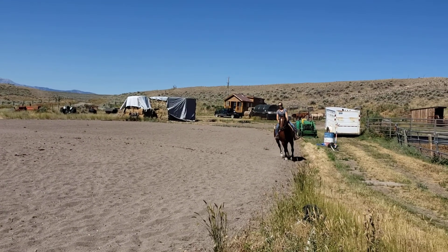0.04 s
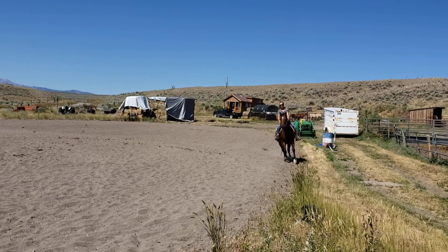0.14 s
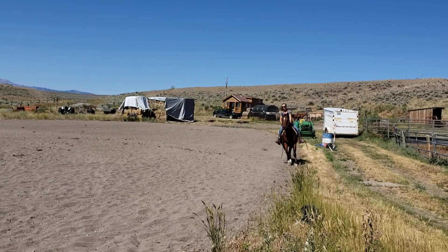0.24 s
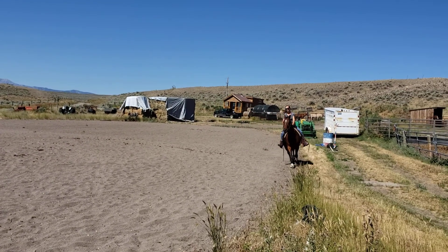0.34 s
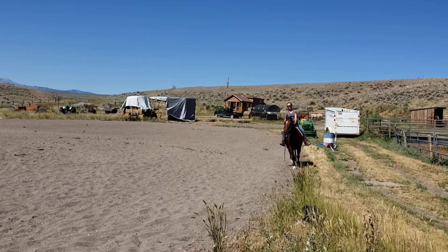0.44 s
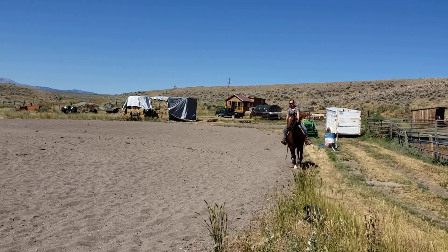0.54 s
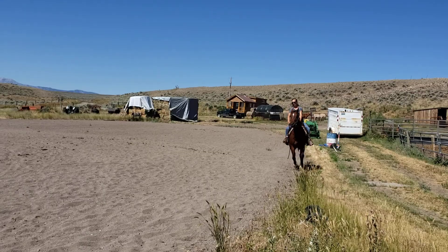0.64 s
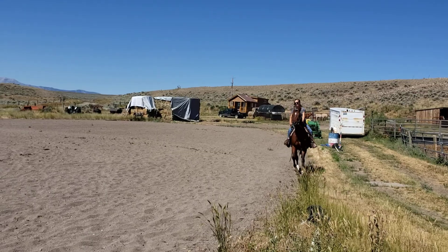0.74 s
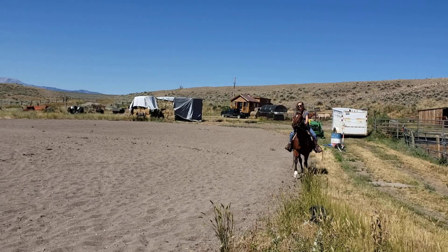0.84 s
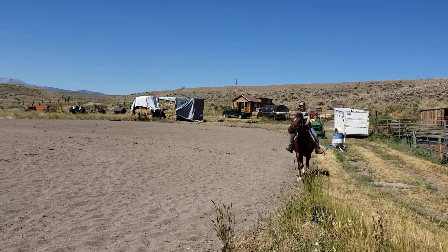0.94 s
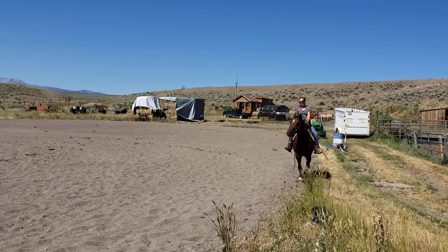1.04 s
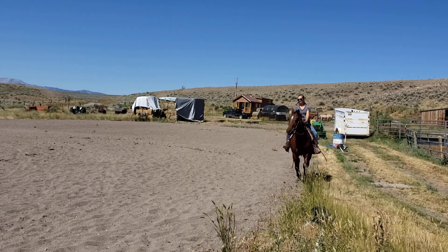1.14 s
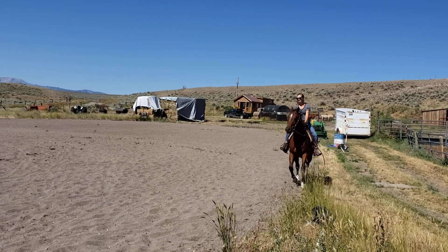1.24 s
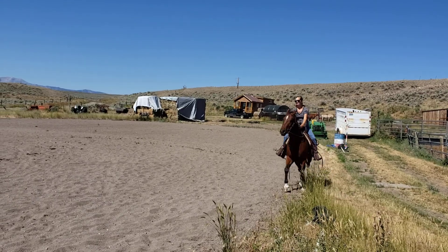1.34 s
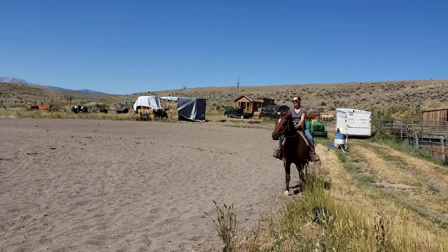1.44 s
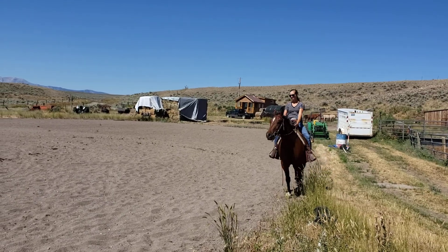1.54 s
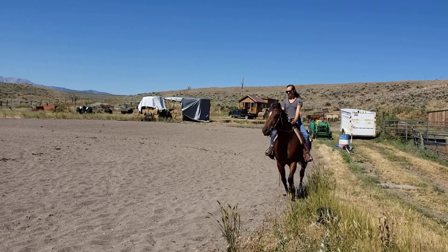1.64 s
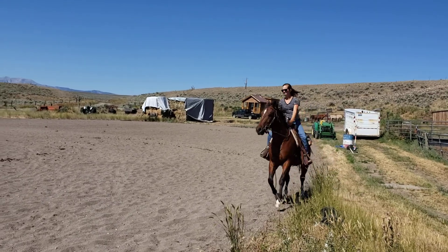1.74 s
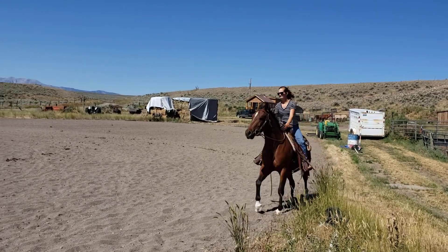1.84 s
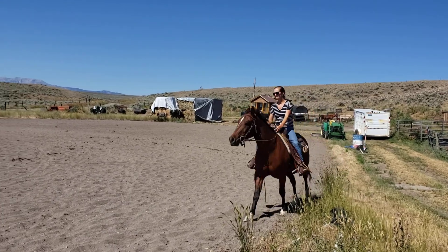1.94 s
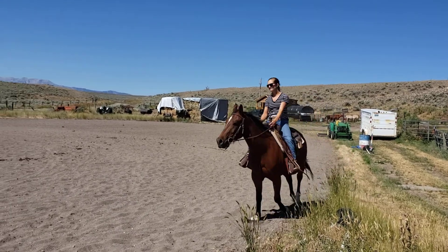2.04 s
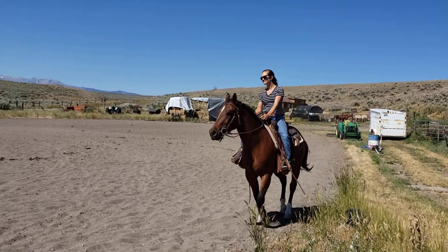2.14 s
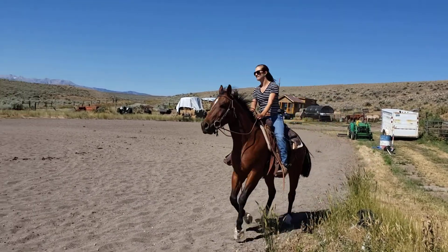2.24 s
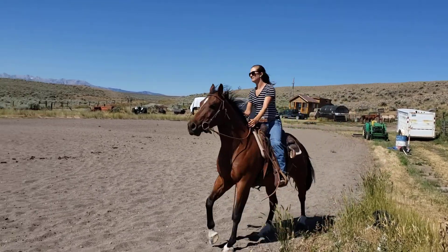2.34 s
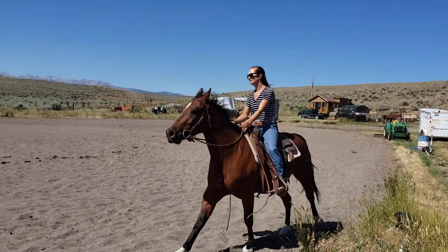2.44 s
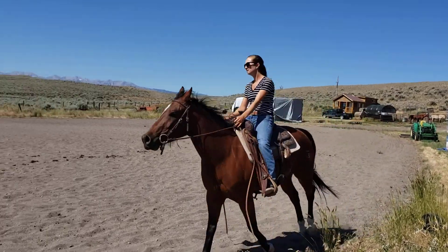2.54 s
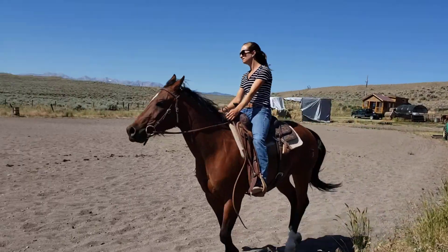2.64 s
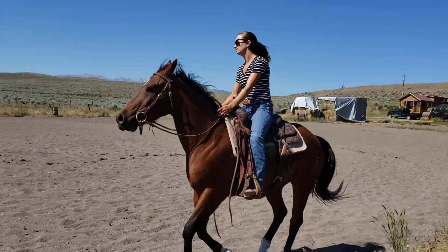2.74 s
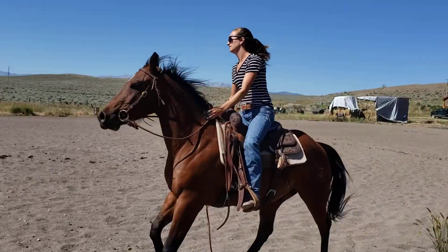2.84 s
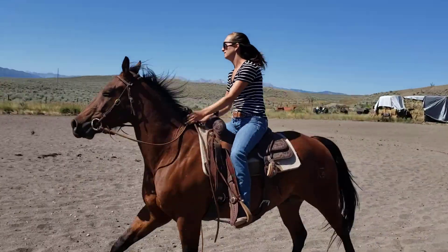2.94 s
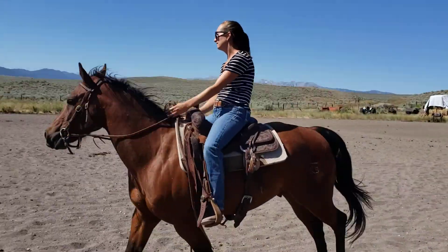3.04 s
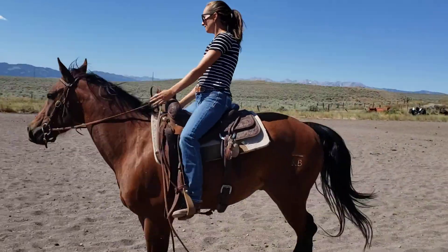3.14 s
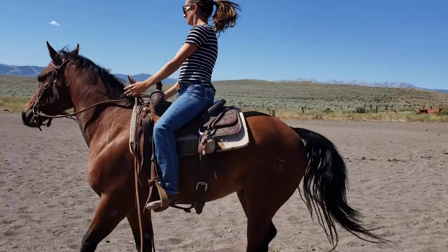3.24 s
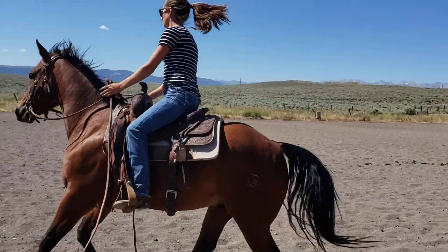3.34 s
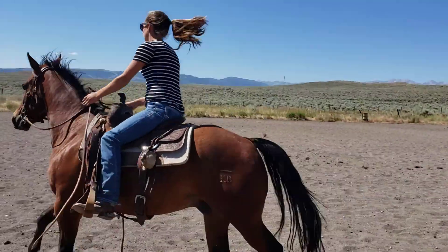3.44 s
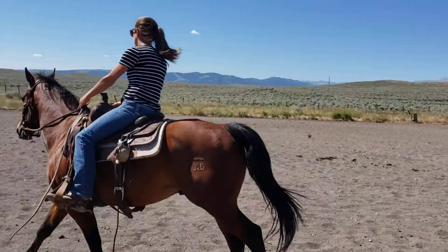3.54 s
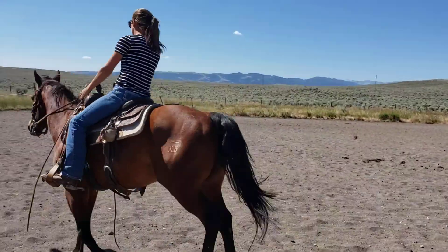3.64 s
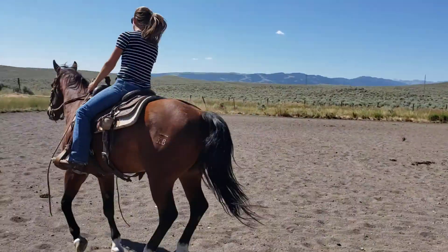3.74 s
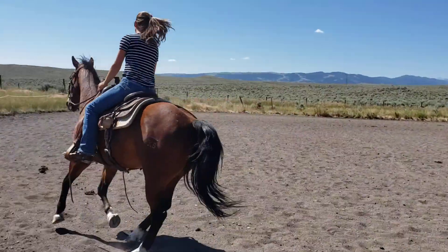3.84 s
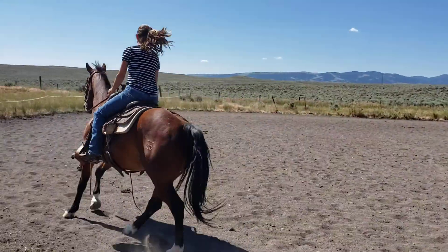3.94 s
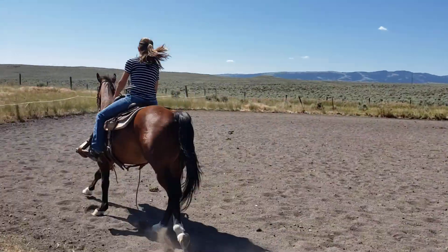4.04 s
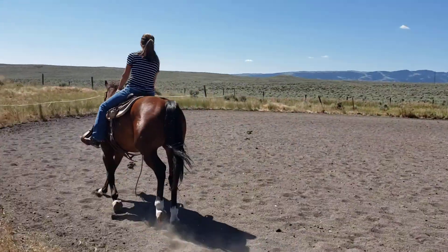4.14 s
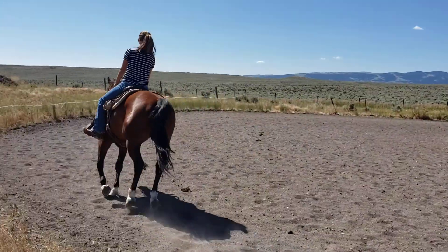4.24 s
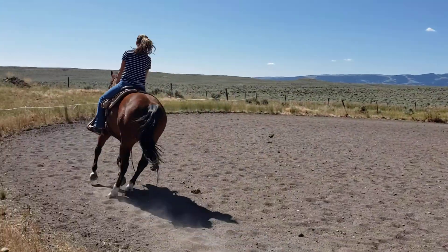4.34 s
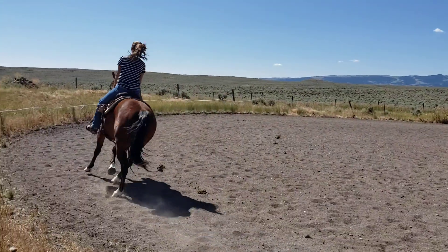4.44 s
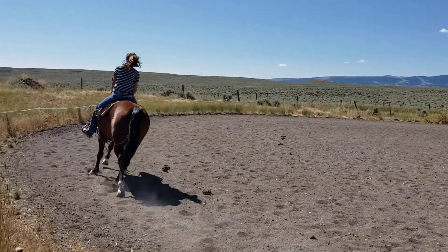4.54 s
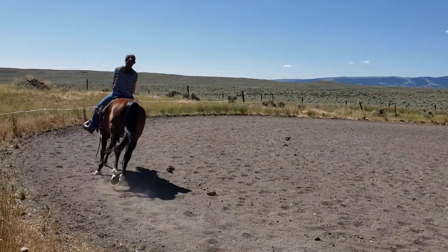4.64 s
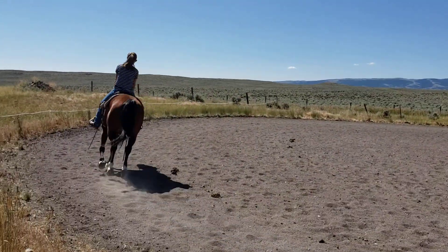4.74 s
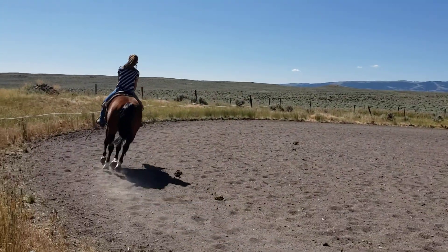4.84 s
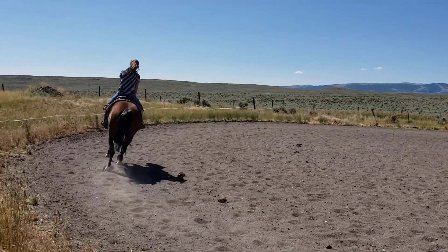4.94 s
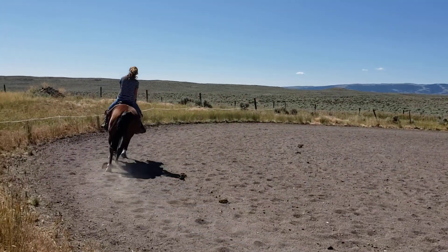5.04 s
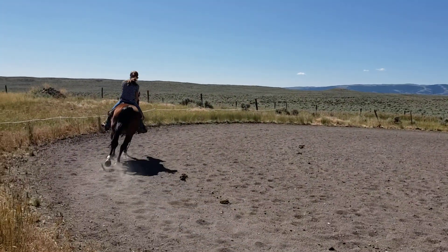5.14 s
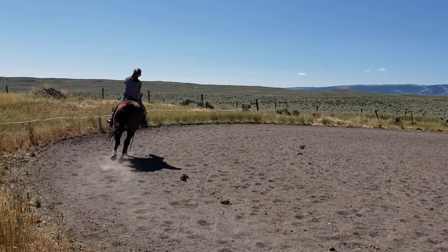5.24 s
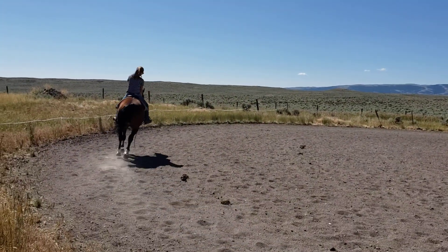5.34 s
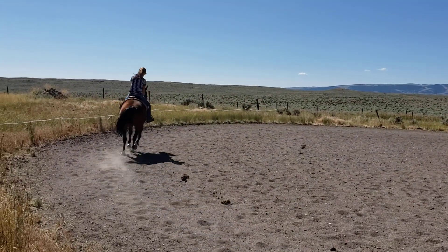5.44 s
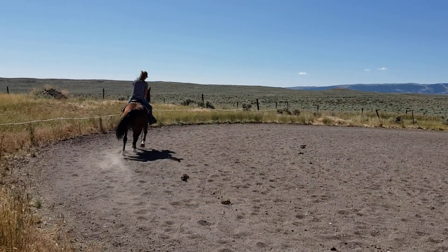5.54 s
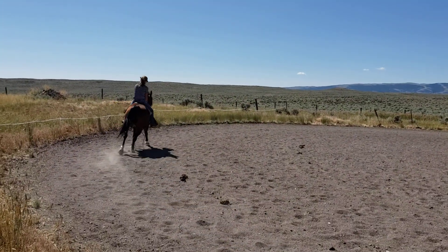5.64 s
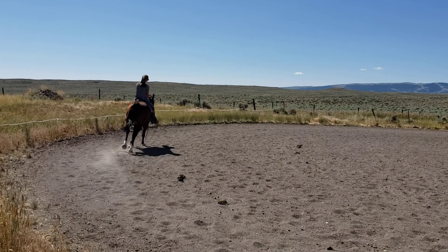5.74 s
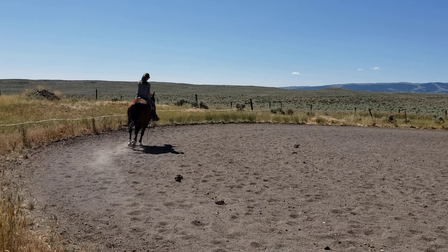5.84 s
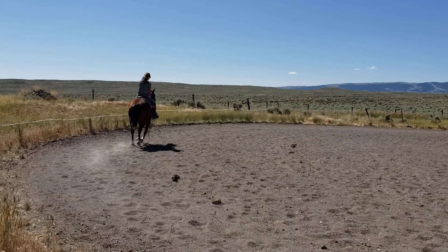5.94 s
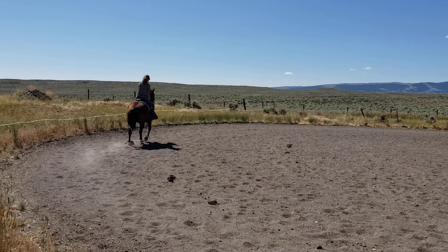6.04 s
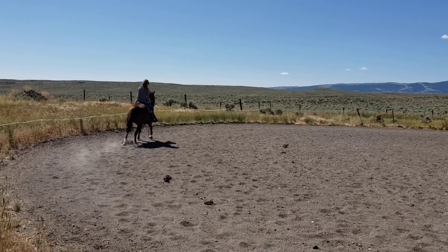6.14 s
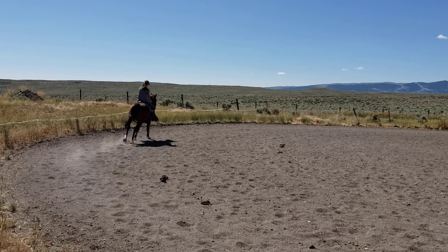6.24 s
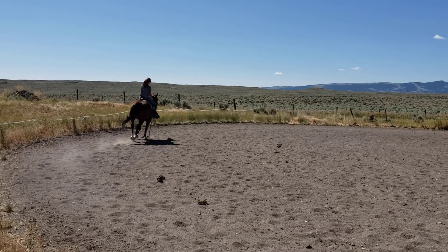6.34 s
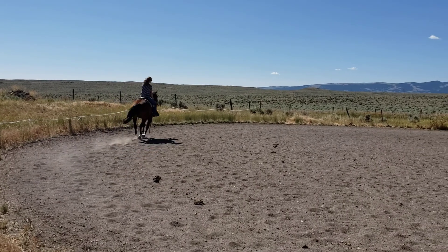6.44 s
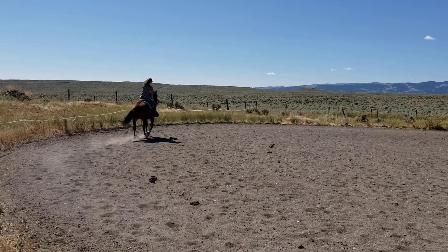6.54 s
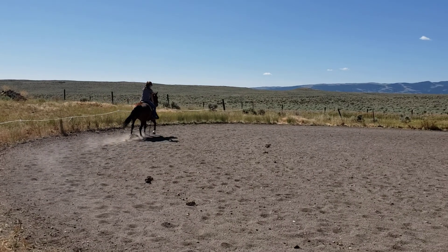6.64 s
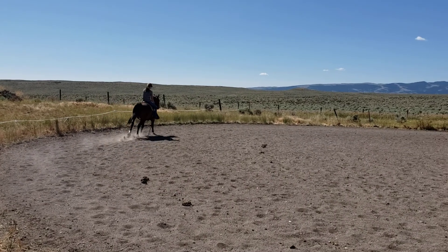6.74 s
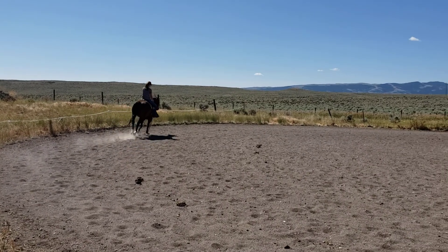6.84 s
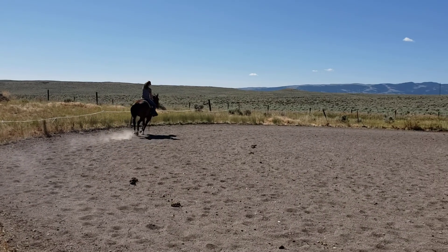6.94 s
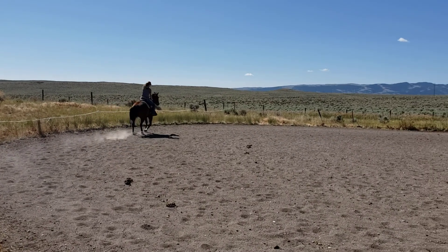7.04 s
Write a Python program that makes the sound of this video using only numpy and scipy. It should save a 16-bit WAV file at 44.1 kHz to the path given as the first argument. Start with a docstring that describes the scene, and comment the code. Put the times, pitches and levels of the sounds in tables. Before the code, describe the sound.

Three-beat hoof falls come closer over loose sand, dull and low, with faint hollow hoots, bright tack ticks and grassy rustle. They strike loudest beside the hand-held microphone, throwing hissing grains, then dwindle. Low gusts buffet mainly the right side, the horse stays mainly left, and high insect hiss lingers in open, echo-free air.

```python
"""A ridden horse lopes over a sand arena, passes close to a hand-held microphone and moves off into open country.
Each hoof thumps the ground (damped pressure swing), crushes sand and throws a spray (shaped noise grains).
Reins and buckles slap and rattle (cracks with noise tails), links jingle (decaying modes), tack and grass rustle.
Soft low gliding hoots come with the stride, insects hiss in bands of noise, gusts buffet and pop the microphone.
No walls, so nothing echoes."""
import sys
import numpy as np
from scipy import signal
from scipy.fft import rfft, irfft
from scipy.io import wavfile

SR = 44100
rng = np.random.default_rng(int(sys.argv[2]) if len(sys.argv) > 2 else 0)


def output_pcm(signal):
    """Save a mono or channel-first signal as 16-bit PCM at the path in sys.argv[1].

    Samples are clipped to [-1, 1] before scaling.
    """
    pcm = np.clip(np.atleast_2d(signal).T, -1, 1) * 32767
    wavfile.write(sys.argv[1], SR, np.round(pcm).astype(np.int16))


N = 312228  # samples, 7.08 s
T = np.arange(N) / SR
FREQ_HZ = np.arange(N // 2 + 1) * SR / N

# Table levels are relative: layers may add a trim.
# hoof landings: landing_s, thump_db, thump_hz, knock_db, crunch_db, sand_hiss_db, shudder_db (re thump), thrown_db
HOOF_LANDINGS = [(0.205, -58, 150, -85, -101, -80, -17, -95), (0.315, -53, 180, -73, -100, -90, -14, -94),
                 (0.431, -70, 133, -77, -84, -74, -5, -73), (0.729, -50.5, 132, -77, -85, -80, -10, -74),
                 (0.852, -41, 181, -70, -94, -79.5, -7.5, -79), (0.949, -64, 175, -70, -91, -68, -3, -68),
                 (1.216, -62, 141, -90, -80, -67, 3, -75), (1.359, -56, 116, -78, -91, -67, -9.5, -72),
                 (1.496, -47.5, 117, -68, -92, -84, -2.5, -67.5),
                 (1.737, -51, 145, -82, -78, -64.5, -16, -64.5),
                 (1.867, -42.5, 149, -63, -77, -63, -8, -63), (1.908, -50, 151, -74, -77, -59.5, -9, -72),
                 (1.99, -51.5, 202, -62, -71, -56, -14, -74),
                 (2.256, -33.5, 137, -74, -68, -55.5, -16.5, -63.5),
                 (2.383, -26, 181, -40, -55, -49.5, -18, -54.5),
                 (2.509, -31.5, 213, -40.5, -91, -48.5, -7, -46),
                 (2.774, -23.5, 194, -55, -56, -45.5, -18, -51),
                 (2.912, -20.5, 165, -31.5, -56.5, -48, -17, -55),
                 (2.951, -34, 270, -39.5, -79, -57, -11, -48), (3.05, -36, 191, -55, -88, -49.5, -21, -44),
                 (3.136, -48.5, 151, -67, -68, -66, -4, -56),
                 (3.312, -20, 176, -38, -48.5, -41, -18.5, -54),
                 (3.449, -27, 197, -64, -58, -43, -17.5, -51),
                 (3.509, -30, 298, -66, -54.5, -41.5, -14.5, -58.5),
                 (3.581, -33.5, 211, -56, -62, -45, -11.5, -53), (3.632, -49, 136, -76, -59, -55, -1, -65),
                 (3.866, -36, 120, -75, -53, -58, -14.5, -83),
                 (3.978, -21, 213, -36.5, -51.5, -42.5, -18, -75),
                 (3.987, -24, 206, -66, -65, -47.5, -35, -69),
                 (4.024, -52, 190, -45, -73, -54.5, 0.5, -54.5), (4.1, -49, 170, -63, -75.5, -60, -5, -56),
                 (4.169, -56.5, 150, -65, -69, -60, -1, -71.5), (4.415, -51.5, 185, -86, -60, -48, -1, -75),
                 (4.521, -38.5, 106, -86, -58, -59.5, -8.5, -69),
                 (4.563, -48, 105, -74, -75.5, -66, -19, -71), (4.623, -50.5, 124, -57, -95, -58, 3.5, -63),
                 (4.729, -55.5, 110, -80, -82, -66.5, 1, -80), (4.97, -48, 90, -69.5, -86, -61, -13, -63),
                 (5.067, -37, 129, -68, -73.5, -61, -6, -65.5),
                 (5.182, -45, 132, -63, -98, -60.5, -11.5, -67.5),
                 (5.269, -60, 120, -80, -86, -74, -4, -89), (5.496, -47.5, 94, -84, -74, -61.5, -9.5, -79),
                 (5.615, -51.5, 136, -68, -71.5, -66.5, -3, -83), (6.025, -65, 190, -75, -69, -64, 1, -74),
                 (6.162, -39, 197, -61, -93, -89, -10, -76), (6.286, -55.5, 133, -63, -87, -67, -6, -72),
                 (6.363, -79, 182, -86, -85, -75, -7, -90), (6.479, -52, 133, -65, -71, -70, -3, -71),
                 (6.565, -52, 128, -72, -70, -56.5, -3, -82), (6.674, -56, 136, -67, -72, -77, -5, -68),
                 (6.829, -50, 303, -67, -93, -75, -1, -73), (6.931, -61.5, 200, -81, -89, -89, -13, -84)]
# spectrum of fine sand: freq_hz, gain_db
SAND_HISS_COLOUR = [(3000, -13), (5200, -19), (6300, -1), (7500, 2), (9000, -2.5), (11000, 2.5),
                    (13000, 0.5), (15500, -4.5)]
# spectrum of low ground and breeze rumble: freq_hz, gain_db
RUMBLE_COLOUR = [(25, -33.5), (60, 4), (130, -1), (240, -4), (380, -11.5), (700, -41.5), (1500, -49.5)]


def amp(db):
    """Decibels to gain."""
    return 10 ** (np.asarray(db) / 20)


def curves(table):
    """Each column after the time as a control interpolated over T."""
    time_s, *columns = np.transpose(table)
    return [np.interp(T, time_s, column) for column in columns]


def response(points):
    """Gain at every FFT frequency from (freq_hz, gain_db) points, interpolated over log frequency."""
    hz, db = np.transpose(points)
    return amp(np.interp(np.log(FREQ_HZ + 1), np.log(hz), db))


def colour(x, points):
    """Causal minimum-phase filter that keeps the power of white noise."""
    gain = response(points)
    unit_gain = gain / np.sqrt(np.mean(gain ** 2))
    cepstrum = irfft(np.log(unit_gain), N)
    # fold the cepstrum to positive time
    cepstrum[1:N // 2] *= 2
    cepstrum[N // 2 + 1:] = 0
    return irfft(rfft(x) * np.exp(rfft(cepstrum)), N)


def walk(rate_hz):
    """Slow random control with a spread near 1: Gaussian knots at rate_hz, joined by lines."""
    knots = rng.standard_normal(4096)
    return np.interp(T * rate_hz, np.arange(len(knots)), knots)


def grains(spread_db, size=12):
    """Dense tiny impacts in two ports: noise whose very uneven level holds for `size` samples."""
    draws = np.minimum(rng.exponential(size=N // size + 1), 2 * np.pi)
    sizes = np.repeat(amp(spread_db * draws), size)[:N]
    return rng.standard_normal((2, N)) * sizes / np.sqrt(np.mean(sizes ** 2))


def bursts(times_s, levels_db, rise_s, fall_s):
    """Envelope of contacts that swell exponentially to their moment and die away; powers add."""
    power = np.zeros(N)
    for s, db in zip(times_s, levels_db):
        near = slice(max(int(s * SR) - SR // 8, 0), int(s * SR) + SR // 3)
        t = T[near] - s
        power[near] += (amp(db) * np.exp(np.minimum(t / rise_s, -t / fall_s))) ** 2
    return np.sqrt(power)


def thuds(times_s, levels_db, pitches_hz, cycles):
    """A heavily damped swing of pressure for each blow, its envelope highest after `cycles` turns."""
    out = np.zeros(N)
    for s, db, hz in zip(times_s, levels_db, pitches_hz):
        near = slice(int(s * SR), int(s * SR) + SR // 10)
        turns = np.maximum(T[near] - s, 0) * hz
        u = turns / cycles
        envelope = (u * np.exp(1 - u)) ** 2
        out[near] -= amp(db) * envelope * np.sin(2 * np.pi * turns)
    return out


def hooves(sand):
    """The toe cuts into the sand, the weight lands with a thump, and the ground shudders and crumbles."""
    # spectrum of knock and crumble: freq_hz, gain_db
    knock_colour = [(200, -13.5), (400, 0.5), (750, 7.5), (1050, -11.5), (1600, -29.5)]
    s, thump_db, hz, knock_db, crunch_db, hiss_db, shudder_db, _ = np.transpose(HOOF_LANDINGS)

    thump = thuds(s - 0.823 / hz, thump_db, hz, cycles=0.47)
    shudder_env = bursts(s + 0.0035, thump_db + shudder_db, rise_s=0.0073, fall_s=0.017)
    shudder = colour(rng.standard_normal(N) * shudder_env, RUMBLE_COLOUR)
    knock = rng.standard_normal(N) * bursts(s - .001, knock_db + 5.0, rise_s=0.0016, fall_s=0.0011)
    crumble_env = bursts(s + 0.003, thump_db - 40.5, rise_s=0.0059, fall_s=0.064)
    crumble = grains(spread_db=3.5, size=90)[0] * crumble_env
    crunch = sand * bursts(s + .001, crunch_db + 6.0, rise_s=.005, fall_s=.024)
    hiss_env = bursts(s - .002, hiss_db + 9.0, rise_s=0.0069, fall_s=0.0098)
    hiss = colour(grains(spread_db=4.5) * hiss_env, SAND_HISS_COLOUR)
    return thump + shudder + colour(knock + crumble, knock_colour) + crunch + hiss


def grit(spread_db, lump_db):
    """Crushed sand: each band has its own grains and lumps, under a peak that moves with the horse."""
    # peak of the crunch along the path: time_s, peak_hz, lift_db
    path = [(0, 1660, 8), (1.0, 1540, 7.5), (2.0, 1680, 12), (3.0, 2320, -1), (4.0, 2520, 4),
            (5.0, 2130, 9), (6.0, 2220, 12), (7.08, 2500, 0.5)]
    # spectrum of the crunch before the lift: freq_hz, gain_db
    crunch_colour = [(300, 3), (500, -10), (780, 2.5), (1100, -3), (1600, -1), (2300, -1.5), (3200, -8.5),
                     (4200, -14.5)]
    peak_hz, lift_db = curves(path)
    colour_hz, colour_db = np.transpose(crunch_colour)
    out, power = 0, 0
    for hz in np.geomspace(330, 4000, 11):
        band_shape = [(hz / 2, -45), (hz * .85, -3), (hz, 0), (hz * 1.15, -3), (hz * 1.6, -40)]
        band = colour(grains(spread_db, size=40), band_shape)
        lift = lift_db * np.exp(-(np.log2(hz / peak_hz) / .4) ** 2)
        base_db = np.interp(np.log(hz), np.log(colour_hz), colour_db)
        gain = amp(base_db + lift) * np.sqrt(hz)  # bandwidth grows with hz
        out = out + band * gain * amp(lump_db * walk(70))
        power = power + gain ** 2
    return out / np.sqrt(power)


def clods(count=1700):
    """Small lumps of earth land one by one, each a dull pat with its own size and pitch."""
    when, size, pitch = rng.random((count, 3)).T
    times_s = when * (N / SR - .11)
    levels_db = -3.0 * np.log(size + .01)
    pats = thuds(times_s, levels_db, 650 * 4.6 ** pitch, cycles=1.3)
    return pats / np.std(pats)


def spray(sand):
    """Every hoof throws sand: clods patter and fine grains hiss as it comes down, and a trickle bridges the steps."""
    # sand trickling between steps, loudest as the horse passes: time_s, coarse_db, fine_db
    trickle = [(0.0, -82, -85), (0.37, -83, -93), (0.75, -80, -88), (1.69, -76.5, -80.5), (1.87, -71, -72),
               (2.13, -73.5, -77), (2.6, -64.5, -69), (2.72, -74, -72.5), (3.47, -64, -60.5),
               (3.67, -72.5, -61.5), (4.73, -86, -79), (5.09, -71, -76.5), (5.34, -85.5, -87.5),
               (6.35, -83.5, -89), (6.64, -80, -84), (7.08, -79, -93)]
    s, *_, thrown_db = np.transpose(HOOF_LANDINGS)
    thrown = bursts(s + 0.002, thrown_db, rise_s=0.04, fall_s=0.048)
    coarse_db, fine_db = curves(trickle)
    coarse = .88 * sand + .4 * clods()
    patter = coarse * np.hypot(thrown, amp(coarse_db + 1.0)) * amp(2.0 * walk(60))
    fine = grains(spread_db=2.0) * amp(3.2 * walk(90))
    fine_env = np.hypot(thrown * amp(-4), amp(fine_db + 7.5))
    return patter + colour(fine, SAND_HISS_COLOUR) * fine_env


def tack():
    """Rein ends and buckles hit with a leathery slap, a snap and a steely tick, then rattle briefly."""
    # reins and buckles striking: time_s, snap_db, tick_db, slap_db, rattle_db (re snap and tick)
    strikes = [(0.0688, -62, -45, -73, -10), (0.1378, -52.5, -38, -73, -12.5),
               (0.6082, -47, -45, -55.5, -23), (0.6207, -69, -66, -65, 7), (0.6502, -63, -62, -70, -3),
               (1.104, -70, -48, -87, -7), (1.157, -72, -40, -77, 1), (1.1656, -67, -44.5, -69, 0),
               (1.653, -56, -21.5, -83, -24), (1.666, -61.5, -51, -93, -1), (1.723, -63.5, -67, -64, 3),
               (1.9021, -45, -27, -62, -18), (2.139, -57, -31, -72, -7), (2.1545, -50, -42, -43, -2),
               (2.165, -52, -43, -41.5, -0.5), (2.1724, -40, -25, -50.5, -31),
               (2.648, -45.5, -22, -73, -19), (2.66, -41, -45, -49, -25), (2.6719, -43, -38, -77, -31),
               (2.6875, -31.5, -19, -34.5, -17), (2.7054, -32, -45, -35.5, -22),
               (2.793, -48, -33, -49, -2.5), (2.9001, -37, -22, -45, -10), (3.0363, -53, -40, -49, 11),
               (3.0507, -39, -39, -71, -22), (3.1635, -51, -26, -72, -15), (3.199, -32.5, -16, -61, -24),
               (3.2311, -22, -17, -25, -13), (3.2364, -38, -17, -54, -11), (3.247, -46, -25, -56, -3.5),
               (3.3083, -30, -25, -33, -18), (3.3276, -40.5, -48, -51, -25), (3.3772, -41.5, -32, -63, -14),
               (3.4357, -34.5, -21, -39, -13.5), (3.4556, -46, -29, -45, -19), (3.6315, -54, -59, -51, 3.5),
               (3.738, -38, -17, -53.5, -32), (3.8435, -45, -46, -55, -0.5), (3.8542, -42.5, -48, -45, -4),
               (4.0688, -42.5, -56, -81, -27), (4.1372, -47, -54, -96, -8.5),
               (4.2836, -45, -37, -63.5, -1.5), (4.3446, -60, -43, -64, -8), (4.394, -52, -37, -75, -7),
               (4.8559, -51, -32, -48, 2), (4.8657, -53, -46, -45, -2), (4.9491, -37.5, -49, -53.5, -20),
               (5.0225, -58.5, -56, -87, -4), (5.093, -45.5, -28, -55, -16), (5.1351, -66, -60, -81, -25),
               (5.377, -71, -45, -87, -24), (5.419, -74, -49, -90, -24), (5.831, -58.5, -52, -83, -19),
               (6.4651, -38, -46, -42, -11.5), (6.5174, -50, -59, -42.5, -8), (6.565, -61, -66, -57, -17)]
    # spectra of leather slap, snap and steel tick: freq_hz, gain_db
    slap_colour = [(400, -27), (900, -13.5), (1500, -7.5), (2200, 0.5), (3300, -4), (4300, -14.5),
                   (6000, -11.5), (9000, -29.5)]
    snap_colour = [(2500, -25.5), (5000, -22), (6200, -4), (7500, -1), (9000, -2.5), (11500, -0.5),
                   (13000, -0.5), (16000, -9)]
    tick_colour = [(5000, -64.5), (8000, -16), (11000, -20), (12700, -9.5), (14500, -5), (16000, -6)]
    s, snap_db, tick_db, slap_db, rattle_db = np.transpose(strikes)

    def strike(db, tail_db, points):
        """A sharp crack, bounces that fade within a few milliseconds, and a loose tail."""
        crack = np.zeros(N)
        crack[(s * SR).astype(int)] = amp(db + 22.0)
        bounces = rng.standard_normal((2, N)) * bursts(s, db + 3.5, rise_s=.0005, fall_s=.0018)
        tail_env = bursts(s + 0.00047, tail_db + 7.0, rise_s=0.00063, fall_s=0.012)
        tail = grains(spread_db=4.0) * tail_env
        return colour(crack + bounces + tail, points)

    slap = strike(slap_db - 4.5, slap_db - 11.0, slap_colour)
    snap = strike(snap_db + 0.5, snap_db + rattle_db + 3.0, snap_colour)
    tick = strike(tick_db - 8.0, tick_db + rattle_db - 6.5, tick_colour)
    return slap + snap + tick


def links():
    """Small steel links of the bridle ring for an instant, each in a cluster of 24 decaying modes."""
    # link strikes: start_s, level_db, centre_hz
    rings = [(0.389, -62, 9200), (0.521, -64, 9800), (0.901, -60, 9450), (0.9154, -58, 8500),
             (1.029, -66, 9800), (1.0899, -69, 9700), (1.163, -56, 13500), (1.238, -62, 12700),
             (1.457, -58.5, 9950), (2.852, -45.5, 11800), (3.008, -49, 10800), (4.557, -51, 11900),
             (4.602, -56, 11600), (5.022, -39.5, 12400), (5.133, -48, 11300), (6.2588, -50.5, 10800),
             (6.6184, -51.5, 11300), (6.7516, -57, 11200), (6.783, -50.5, 11000), (6.927, -51, 11900),
             (6.9791, -58, 11000)]
    out, t = np.zeros((2, N)), T[:SR // 10]
    for s, db, hz in rings:
        modes_hz = hz * (1 + .11 * rng.standard_normal((24, 1)))
        phase = rng.uniform(0, 2 * np.pi, (2, len(modes_hz), 1))
        cluster = np.sin(2 * np.pi * modes_hz * t + phase).sum(axis=1)
        ring = cluster * np.exp(-t / 0.0047) * (1 - np.exp(-t / 0.00047))
        i = int(s * SR)
        out[:, i:i + len(t)] += amp(db - 3.5) * ring[:, :N - i]
    return out


def rustle():
    """Tack, tail and dry grass rustle with a thin, high crackle that swells in swishes."""
    # rustle as the horse comes and goes: time_s, level_db
    rustle_levels = [(0.0, -71), (0.34, -81), (0.69, -76), (1.06, -72), (1.18, -78), (2.21, -69),
                     (2.31, -62), (2.98, -63), (3.37, -54.5), (4.26, -62), (4.4, -72), (5.6, -80)]
    # tail, legs and tack brushing dry grass and leather: peak_s, level_db
    brushes = [(0.07, -76), (0.92, -68), (1.12, -70), (1.22, -63), (1.37, -61), (1.48, -64), (1.58, -70),
               (1.76, -61), (1.99, -63), (2.3, -60), (2.39, -68), (2.8, -59), (3.42, -56), (3.6, -61),
               (3.79, -57)]
    db, = curves(rustle_levels)
    s, swish_db = np.transpose(brushes)
    swishes = bursts(s, swish_db, rise_s=0.044, fall_s=.04)
    crackle_colour = [(6000, -24.5), (9000, -8), (12000, -12.5), (14000, 3.5), (15400, 7), (16500, -19)]
    crackle = colour(grains(spread_db=4.0), crackle_colour)
    flutter_db = 1.8 * walk(60) + 1.5 * walk(12)
    return crackle * np.hypot(amp(db), swishes) * amp(5.0 + flutter_db)


def hoots():
    """Short, hollow, gliding sine tones that swell and fade with the stride."""
    # hoots: middle_s, level_db, pitch_hz (at the middle), glide_octaves_per_s
    tones = [(1.04, -56.5, 133.7, 6), (1.226, -54.5, 145, 4.5), (1.547, -53.5, 136.7, -14.5),
             (1.66, -58, 137, 9), (2.15, -54, 144, -1.5), (2.287, -47, 124, -1), (2.65, -55, 156.7, 2.5),
             (2.695, -44.5, 148.2, -5), (4.30, -62, 153, 4.5), (5.98, -62.5, 145.7, -1.5),
             (6.508, -57, 160.7, 2.5), (6.95, -62, 136, -5.5)]
    out = np.zeros(N)
    for s, db, hz, glide in tones:
        near = np.abs(T - s) < .1
        t = T[near] - s
        turns = np.cumsum(hz * 2 ** (glide * t)) / SR
        swell = np.exp(-(t / 0.029) ** 2)
        out[near] += amp(db - 0.5) * swell * np.sin(2 * np.pi * (turns + rng.random()))
    return out


def insects():
    """Grasshoppers rasp in bouts in the dry grass, each a noise band at its own pitch with a fast, uneven throb."""
    # song bouts at full level, fades lie outside: start_s, end_s, level_db, pitch_hz
    bouts = [(0.0, 0.506, -79, 10000), (0.816, 1.0, -74.5, 9650), (1.395, 2.0, -70.5, 12100),
             (4.507, 4.694, -62, 11400), (4.897, 5.277, -65.5, 11450), (5.3, 7.08, -73.5, 11100),
             (5.3, 7.08, -74.5, 14300), (5.8, 6.6, -69, 12400), (5.902, 6.598, -68, 15200),
             (6.55, 7.085, -65, 11300), (6.65, 7.08, -77, 12600), (6.7, 7.002, -81, 2620)]
    fade_s = 0.051
    out = 0
    for start, end, db, hz in bouts:
        band_shape = [(hz * .65, -35), (hz * .88, -11), (hz, 0), (hz * 1.12, -11), (hz * 1.4, -30)]
        rasp = colour(grains(spread_db=2.5), band_shape)
        throb_db = 3.2 * walk(75) + 1.5 * walk(14)
        gate = np.clip(np.minimum(T - start, end - T) / fade_s + 1, 0, 1)
        out = out + rasp * gate * amp(db + throb_db)
    return out


def wind():
    """Gusts swell on the ports, mostly on the right one, and now and then pop, over a low rumble."""
    # gusts: peak_s, level_db, rise_s, fall_s
    gusts = [(0.08, -58, 0.055, 0.041), (0.23, -60, 0.031, 0.041), (3.14, -65, 0.058, 0.027),
             (4.0, -53, 0.14, 0.11), (4.62, -50, 0.13, .1), (4.79, -44.5, 0.052, 0.025),
             (5.031, -39.5, 0.045, 0.063), (5.21, -48.5, 0.037, 0.038), (5.46, -50.5, 0.019, 0.06),
             (6.28, -58.5, 0.036, .03), (6.43, -48, 0.015, 0.11), (6.8, -63, 0.038, 0.064)]
    # low rumble of breeze and ground: time_s, level_db
    rumble_levels = [(0.0, -79), (0.75, -75.5), (0.93, -70.5), (1.89, -70), (2.84, -56.5), (3.27, -61),
                     (3.47, -57), (3.65, -68.5), (3.94, -68), (4.38, -70.5), (4.63, -65.5), (4.79, -68),
                     (5.15, -74), (5.84, -78.5), (6.72, -65), (7.08, -73.5)]
    # single eddies popping on the microphone: time_s, level_db, pitch_hz
    eddies = [(0.065, -42, 59.2), (4.633, -39.5, 75.4), (4.778, -31.5, 72.5), (4.996, -43, 53),
              (5.028, -34, 70.6), (5.069, -30.5, 83.4), (6.444, -41, 52)]
    # spectrum of the buffeting: freq_hz, gain_db
    buffet_colour = [(15, -30), (30, -6.5), (50, 1), (80, -3), (130, -15), (300, -34.5), (800, -75)]
    steady_breeze = amp(-77)
    swell = steady_breeze + sum(bursts([s], [db], rise, fall) for s, db, rise, fall in gusts)
    rumble_db, = curves(rumble_levels)
    shared, own = rng.standard_normal(N), rng.standard_normal((2, N))
    # column gains: left, right
    turbulence = shared * np.array([[.45], [.9]]) + own * np.array([[.3], [1.1]])
    buffet = colour(turbulence, buffet_colour) * swell
    rumble = colour(shared + .25 * own, RUMBLE_COLOUR) * amp(rumble_db + 1.5 + 1.8 * walk(18))
    s, db, hz = np.transpose(eddies)
    pops = thuds(s - .002, db - 1.5, hz, cycles=0.68) * np.array([[.3], [1.7]])
    return buffet + rumble + pops


def country():
    """Faint moving air over open land: coloured noise with a slowly wandering level."""
    # spectrum of the air: freq_hz, gain_db
    air_colour = [(20, -4.5), (100, -2), (300, -12), (600, -14), (1800, -22.5), (3500, -24.5), (6000, -30),
                  (9000, -56.5), (16000, -23)]
    return colour(rng.standard_normal((2, N)), air_colour) * amp(-74.0 + 1.0 * walk(2.3))


def scene():
    """Horse and grass sound mainly in the left port; wind and air reach both."""
    # right port shaded from the horse: freq_hz, gain_db (re left)
    shade = [(150, 1), (380, -5.5), (700, -9.5), (1300, -20.5), (2400, -28.5), (4400, -9.5), (7500, -38),
             (9500, -9.5), (11500, -10), (13500, -8), (15500, -14.5)]
    right_lag_s = .00014
    # the crust gives way in clumps, so all bands of the crunch surge together
    sand = grit(spread_db=3.3, lump_db=2.2) * amp(3.2 * walk(190) - .8)
    near = hooves(sand) + spray(sand) + tack() + links() + rustle() + hoots() + insects()
    lag = np.exp(-2j * np.pi * FREQ_HZ * right_lag_s)
    near[1] = irfft(rfft(near[1]) * response(shade) * lag, N)
    return near + wind() + country()


def record(dry):
    """The recorder cuts the top of the treble: elliptic low-pass, 0.2 dB ripple, 70 dB stop band."""
    top_hz = 15900
    return signal.sosfilt(signal.ellip(8, .2, 70, top_hz, fs=SR, output="sos"), dry)


dry = scene()
out = record(dry)
output_pcm(out)
```